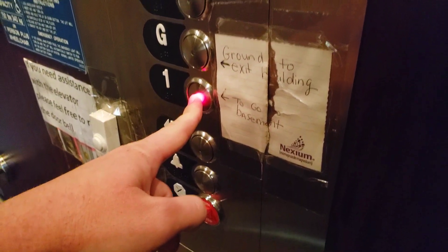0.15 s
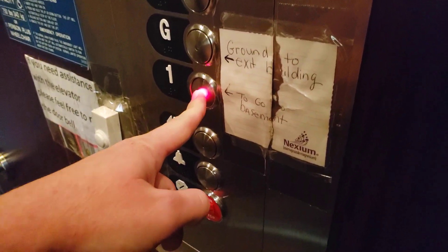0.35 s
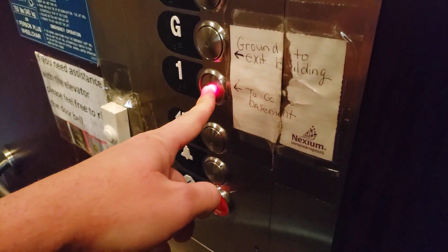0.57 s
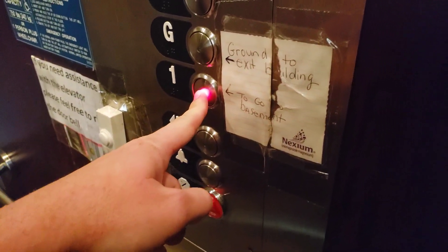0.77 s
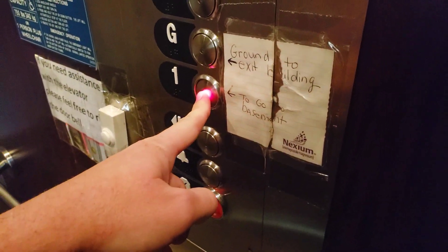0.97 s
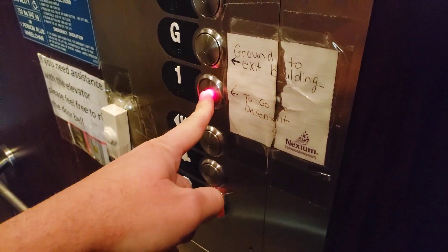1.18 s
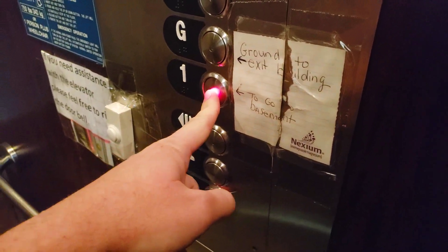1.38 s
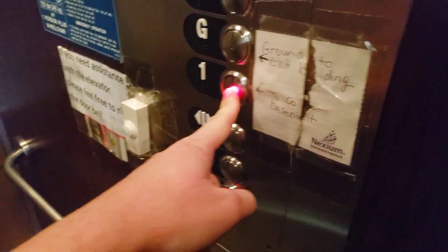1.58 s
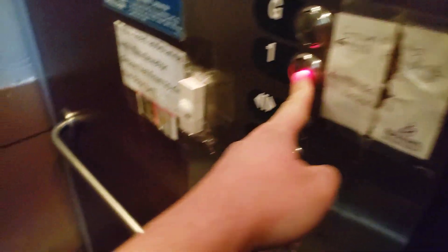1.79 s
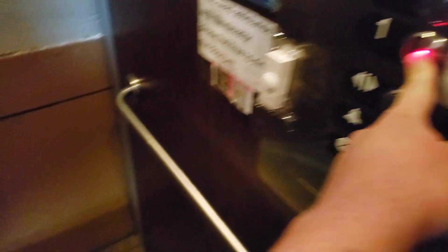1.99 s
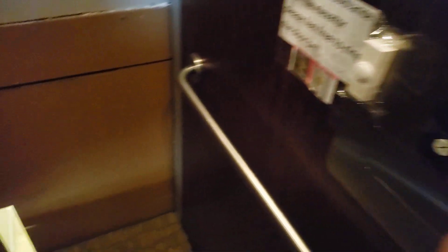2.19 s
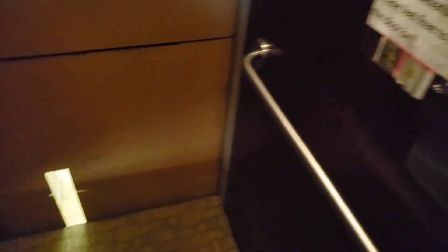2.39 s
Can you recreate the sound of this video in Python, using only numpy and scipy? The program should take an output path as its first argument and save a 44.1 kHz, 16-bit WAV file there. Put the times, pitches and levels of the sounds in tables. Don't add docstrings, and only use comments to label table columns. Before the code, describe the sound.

Loud clunk and clanging knock of a lift mechanism about a quarter second apart, over motor hum, shaking cab rumble and soft floor bumps, with small ticks afterwards; heard on a phone inside a tight metal cab.

```python
import sys
import numpy as np
from scipy import signal
from scipy.fft import rfft, irfft
from scipy.io import wavfile
from scipy.ndimage import uniform_filter1d

SR = 44100
rng = np.random.default_rng(int(sys.argv[2]) if len(sys.argv) > 2 else 0)


def put_to_file(sound):
    columns = np.atleast_2d(sound).T
    safe = np.clip(columns, -1, 1)
    whole_steps = np.round(safe * 32767)
    wavfile.write(sys.argv[1], SR, whole_steps.astype(np.int16))


def boost_factor(decibels):
    exponent = np.asarray(decibels, float) / 20
    return 10 ** exponent


N = 108045
ALIKE_HZ = 850

# f/Hz, level/dB per Hz
TICK_CRACK = [(1000, -8), (2600, 1), (3500, -5.5), (4500, -1), (6500, -14.5), (11000, -11), (15500, -17)]


def level(x, db):
    return x * boost_factor(db) / np.sqrt(np.mean(x ** 2))


def shape(table, hz):
    table = np.array(table)
    return np.interp(np.log(hz + 1), np.log(table[:, 0]), table[:, 1])


def colour(x, table):
    size = x.shape[-1]
    gain = boost_factor(shape(table, np.fft.rfftfreq(size, 1 / SR)))
    return irfft(rfft(x) * gain, size)


def band(x, hz, width):
    return signal.lfilter(*signal.iirpeak(hz, hz / width, fs=SR), x)


def ring(x, modes):
    out = 0
    for hz, db, t60 in modes:
        pole = np.exp(2j * np.pi * hz / SR - np.log(1000) / (t60 * SR))
        out = out + boost_factor(db) * signal.lfilter([1], [1, -pole], x).imag
    return out


def walk(rate):
    k = int(SR / rate)
    x = np.repeat(rng.standard_normal(N // k + 1), k)
    x = uniform_filter1d(uniform_filter1d(x, k), k)[:N]
    return (x - x.mean()) / x.std()


def pair(alike_hz, size=N):
    mid, side = rng.standard_normal((2, size))
    side = signal.lfilter(*signal.butter(1, alike_hz, "high", fs=SR), side)
    return np.array([mid + side, mid - side])


def motor(t, hz, db):
    phase = 2 * np.pi * np.cumsum(hz) / SR
    flutter_db = 4.2 - 3 * np.clip((t - 1.15) / 0.1, 0, 1)
    db = db + 2.0 + flutter_db * walk(18)
    pan_db, lag = np.array([[-1], [1]]), np.array([[0.064], [0]])
    hum = boost_factor(db + pan_db) * np.sin(phase + lag)
    loaded = np.clip((t - 0.74) / 0.092, 0, 1)
    octave = boost_factor(db - 19.5) * np.sin(2 * phase) * (1 - 0.12 * loaded)
    panel_hz = 273.9 + 1.56 * walk(13)
    panel = np.sin(2 * np.pi * np.cumsum(panel_hz) / SR) * boost_factor(0.6 * walk(14))
    panel = level(panel, -55) * loaded * boost_factor(0.72 * (db + 36.5))
    mains = level(band(rng.standard_normal(N), 125, 0.79), -51.5) * (1 - 0.86 * loaded)
    return hum + octave + panel + mains


def rumble(shake_db, air_db):
    # f/Hz, width/Hz, level/dB
    resonances = [(35.9, 6.1, -1.5), (57.7, 14.8, -0.5), (90.3, 49.7, -5.5), (210.5, 67, -19),
                  (264.2, 39, -22), (403, 50, -29.5)]
    # f/Hz, level/dB per Hz
    air_colour = [(25, -9), (60, 0.5), (150, -8), (300, -19.5), (500, -32), (800, -56), (1500, -45.5),
                  (4000, -57.5)]
    cab = 0
    for hz, width, db in resonances:
        sway = boost_factor(db + 1.7 * walk(9.46))
        cab = cab + sway * level(band(band(pair(1600), hz, width), hz, 2 * width), 0)
    air = level(colour(pair(1000), air_colour), -51) * boost_factor(0.38 * air_db)
    return level(cab, -1) * boost_factor(shake_db) + air


def whirr(t, db):
    # f/Hz, width/Hz, level/dB, share of the drive's swell
    resonances = [(970, 340, -3.5, 1.45), (2170, 700, -0.5, 0.49), (4400, 64, -12, 0.62),
                  (4900, 1100, -8.5, 1.2), (5520, 90, -7.5, 0.78), (5990, 1200, -3.5, 0.96),
                  (8680, 1000, -7.5, 0.87)]
    whine_hz = resonances[4][0]
    whine_db = np.clip((t - 0.23) * 700, -25, 3)
    out = 0
    for hz, width, band_db, share in resonances:
        swell_db = whine_db if hz == whine_hz else db
        gain = boost_factor(band_db - 72 + share * swell_db + 1.1 * walk(18))
        out = out + gain * level(band(band(pair(300), hz, width), hz, 1.2 * width), 0)
    return out


def floor_bumps(t):
    # t/s, level/dB
    bumps = [
        (.1, -39),
        (0.19, -37.5),
        (.37, -38),
        (0.572, -42.5),
        (1.521, -37),
        (1.632, -43),
        (1.782, -40),
        (2.031, -36.5),
        (2.161, -46),
    ]
    # f/Hz, level/dB, t60/s
    modes = [(55.16, -2, 0.36), (84.5, -8, 0.19)]
    width = 0.011
    push = 0
    for s, db in bumps:
        wobble = np.exp(-((t - s) / width) ** 2) * np.sin(2 * np.pi * modes[0][0] * (t - s))
        push = push + boost_factor(db + 11.0) * wobble / (width * SR)
    return ring(push, modes)


def frame_jolts(t):
    # t/s, level/dB, push/s
    jolts = [
        (.128, -45, 0.0013),
        (.772, -34.5, 0.0017),
        (.83, -42, 0.011),
        (0.973, -30, 0.0055),
        (1.014, -24.5, 0.0052),
        (1.093, -37, .005),
    ]
    # f/Hz, level/dB, t60/s
    modes = [(36.16, -2, 1.38), (48.2, -5, 0.54), (61.47, -5, 1.1), (98.5, 9, 0.29), (211, 1.5, 0.29),
             (277, -20, .3), (328, -26, 0.49), (420, -12.5, .3)]
    push = sum(boost_factor(db) * np.exp(-((t - s) / width) ** 2) / (width * SR) for s, db, width in jolts)
    return ring(push, modes)


def shaft(t):
    # f/Hz, t60/s
    decay = [(200, 0.67), (800, 0.84), (2000, 0.24), (4000, 0.42), (8000, 0.11), (14000, 0.063)]
    t, tail = t[:int(SR)], 0
    for hz in 125 * 2 ** np.arange(0, 7.1, 0.5):
        t60 = shape(decay, hz)
        tail = tail + band(pair(ALIKE_HZ, len(t)), hz, hz / 2.95) * boost_factor(-60 * t / t60) / np.sqrt(t60)
    tail = tail * np.clip(t / 0.0048, 0, 1)
    return boost_factor(6.5) * tail / np.sqrt(np.sum(tail ** 2) / 2)


def part(t, echoes, hits, crack, modes, ring_db, split, rough_db):
    start = int(hits[0][0] * SR)
    t = t[start:start + int(SR)] if modes else t[start:]

    def swell(late):
        out = 0
        for s, db, rise, fall in hits:
            since = t - late - s
            attack = np.clip(since / rise, 0, 1) ** 2
            out = out + boost_factor(db) * attack * np.exp(-np.clip(since - rise, 0, None) / fall)
        return out

    env = swell(0) * boost_factor(rough_db * walk(700)[:len(t)])
    power = 10 * np.log10(np.mean(env ** 2))
    x = level(colour(env * rng.standard_normal(len(t)), crack), power)
    out = x + signal.fftconvolve(x[None], echoes, axes=1)[:, :len(t)]
    for hz, db, t60 in modes:
        late = 0.0018 * hz / 1000
        drive = band(swell(late) * pair(ALIKE_HZ, len(t)), hz, hz / 16)
        group = [(hz * (1 - split), -2, t60), (hz, 0, t60), (hz * (1 + split), -4, t60)]
        both = ring(drive, group)
        out = out + np.array([level(y, power + ring_db + db - 5.5) for y in both])
    return np.pad(out, ((0, 0), (start, N - start - len(t))))


def ticks(t, echoes):
    # t/s, level/dB, rise/s, fall/s
    hits = [
        (0.314, -58.5, 0.0011, 0.0022),
        (1.238, -63, 0.0012, 0.017),
        (2.29, -61.5, .006, 0.021),
    ]
    return part(t, echoes, hits, TICK_CRACK, [], 0, 0, rough_db=-2.5)


def scuffs(t, echoes):
    # t/s, level/dB, rise/s, fall/s
    hits = [
        (.326, -53.5, 0.019, 0.039),
        (2.296, -59.5, 0.019, 0.032),
    ]
    # f/Hz, level/dB per Hz
    crack = [(250, 3.5), (600, 3), (1300, -5.5), (2100, -2), (3500, -10.5), (7000, -18.5), (11500, -9),
             (15500, -20)]
    return part(t, echoes, hits, crack, [], 0, 0, rough_db=2.0)


def latch(t, echoes):
    # t/s, level/dB, rise/s, fall/s
    hits = [
        (.742, -43.5, 0.014, 0.0095),
        (0.751, -32, 0.016, 0.043),
    ]
    # f/Hz, level/dB per Hz
    crack = [(150, -6), (300, -12), (950, -26.5), (1900, -19.5), (2810, -16.5), (5990, -30.5), (8830, -34),
             (13000, -29.5), (15700, -39.5)]
    # f/Hz, level/dB, t60/s
    latch_modes = [(471, -7, 0.19), (781, -7.5, 0.7), (1225.5, -7.5, 0.33), (1610, -5.5, 0.8),
                   (1960, -6, 0.4), (2190, 3, 0.2), (2275, -1.5, 0.44), (2524, -3, 0.061), (2548, -2, .2),
                   (2760, -1, 0.25), (3140, -5, 0.2), (3270, -8, .2), (4330, -8.5, 0.36),
                   (5820, -4.5, 0.046)]
    door_modes = [(344.2, -8, 0.74), (399.6, -8.5, 0.37), (2940, -7, 0.34), (3596, -9.5, 0.26),
                  (4060, -11, 0.31), (4161, -10, 0.19), (4810, -10, .2), (5400, -10, 0.12),
                  (6170, -10, .12)]
    return part(t, echoes, hits, crack, latch_modes + door_modes, 1.5, 0.0061, rough_db=2.5)


def bar(t, echoes):
    # t/s, level/dB, rise/s, fall/s
    hits = [
        (1.0, -39, 0.015, 0.03),
        (1.037, -48, 0.0081, 0.011),
        (1.085, -51, 0.02, 0.0069),
    ]
    # f/Hz, level/dB per Hz
    crack = [(88, -41), (150, -1), (660, -10.5), (1100, -10.5), (3830, -12.5), (4310, -17.5), (5990, -24.5),
             (7800, -43.5), (15500, -52)]
    # f/Hz, level/dB, t60/s
    bar_modes = [(750, -3.5, 0.54), (3220, -3, 0.17), (3350, -1, 0.23), (3836, 0, 0.23), (4770, -7, 0.22),
                 (5363, 1, 0.19), (6370, -10, .14), (7250, -14.5, 0.11), (8260, -15, 0.092),
                 (9600, -21, 0.16), (10900, -26, 0.054), (11800, -24.5, 0.092), (13000, -39, .04),
                 (14500, -36, .04)]
    rail_modes = [(317, -14, 0.36), (417, -7.5, 0.43), (636, -8.5, 0.48), (974, -8.5, 0.65),
                  (1053, -11.5, 0.43), (3790, -5.5, .5), (3910, -3, 0.28), (3520, -7, 0.1),
                  (4120, -13, .12), (5000, -14, 0.15), (5280, -4, 0.36), (6660, -17, 0.3)]
    return part(t, echoes, hits, crack, bar_modes + rail_modes, 6, 0.009, rough_db=1.5)


def knock(t, echoes):
    # t/s, level/dB, rise/s, fall/s
    hits = [
        (1.289, -58, 0.0088, 0.038),
    ]
    # f/Hz, level/dB, t60/s
    modes = [(2420, 7.5, .15), (3040, 3.5, 0.13), (4420, 0, 0.1)]
    return part(t, echoes, hits, TICK_CRACK, modes, 2.9, 0.025, rough_db=2.0)


def squeaks(t):
    # t/s, half length/s, f/Hz, level/dB
    calls = [
        (1.516, 0.14, 521, -68),
        (2.395, 0.0435, 1510, -58.5),
    ]
    out = 0
    for s, half, hz, db in calls:
        env = boost_factor(db + 2 * walk(30.5)) * np.exp(-((t - s) / half) ** 4)
        wavering = t + 0.0025 * np.cumsum(walk(7.8)) / SR
        out = out + env * np.sin(2 * np.pi * hz * wavering)
    return out


def scene():
    # t/s, hum f/Hz, hum level/dB, shake level/dB, whirr level/dB
    course = np.array([(0, 141.6, -57, -71.5, -22.5), (.13, 141.2, -45.5, -39.5, -19),
                       (.22, 140.8, -44, -34, -14), (.31, 141.5, -46.5, -38, 2.5),
                       (.4, 142.7, -44, -36.5, -2), (.48, 141.6, -38.5, -42.5, 2),
                       (.59, 142.3, -43, -33.5, 3.5), (.74, 142.4, -33, -50, 1.5),
                       (.85, 142.8, -44, -28, -4.5), (1.0, 142.1, -33, -29, 8),
                       (1.09, 144.1, -40.5, -28, 13), (1.2, 142.7, -40, -37.5, 5.5),
                       (1.43, 144.8, -38.5, -38, 4), (1.66, 143.3, -37.5, -39.5, 2.5),
                       (1.89, 144.4, -41.5, -45.5, 1.5), (2.09, 143.6, -41, -51.5, 3),
                       (2.2, 142.9, -43, -52, 2.5), (2.45, 142.6, -44.5, -46.5, 4.5)])
    t = np.arange(N) / SR
    hz, hum_db, shake_db, whirr_db = (np.interp(t, course[:, 0], c) for c in course[:, 1:].T)
    steady = motor(t, hz, hum_db) + rumble(shake_db, whirr_db) + whirr(t, whirr_db)
    structure = floor_bumps(t) + frame_jolts(t) + squeaks(t)
    echoes = shaft(t)
    light = ticks(t, echoes) + scuffs(t, echoes) + knock(t, echoes)
    loud = latch(t, echoes) + bar(t, echoes)
    return steady + structure + light + loud


def band_limit(x):
    return signal.sosfilt(signal.butter(12, 15740, fs=SR, output="sos"), x)


def record(dry):
    # f/Hz, level/dB
    left_port = [(100, -0.63), (1000, 0.5), (2400, -3.5), (5000, -4.5), (7000, -30), (8500, -60),
                 (10500, -29.5), (15000, -6)]
    # f/Hz, level/dB per Hz
    hiss_colour = [(3000, 0), (9000, -24.5), (12000, -2)]
    # f/Hz, level/dB
    edges = [(16, -50), (27, -18), (34, 0), (15700, 0), (15770, -90)]
    hiss = level(colour(rng.standard_normal((2, N)), hiss_colour), -78)
    left = colour(dry[0], left_port)
    right = np.pad(dry[1], (12, 0), mode="edge")[:N]
    mix = colour(np.array([left, right]) + hiss, edges)
    return band_limit(mix)


dry = scene()
out = record(dry)
put_to_file(out)
```